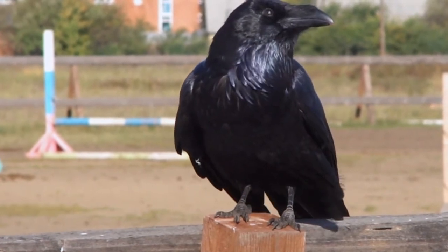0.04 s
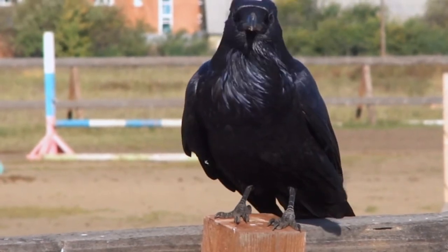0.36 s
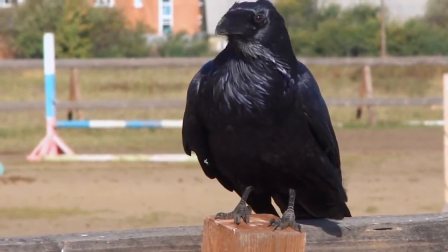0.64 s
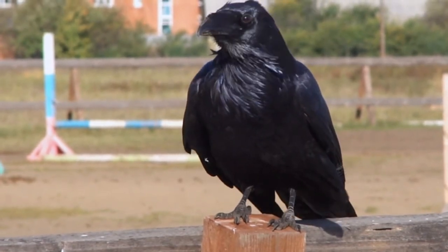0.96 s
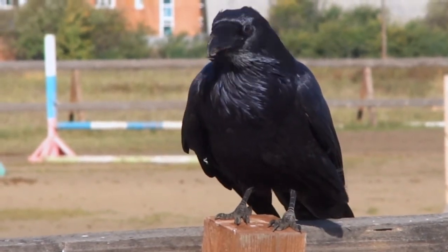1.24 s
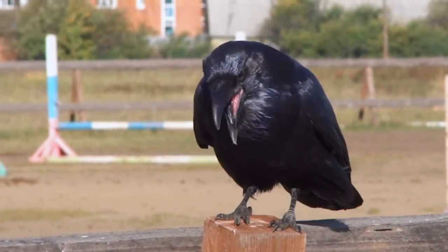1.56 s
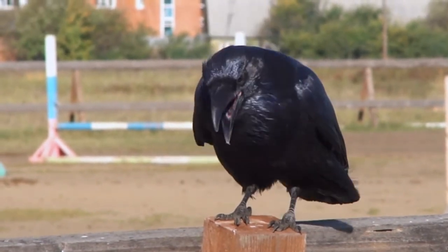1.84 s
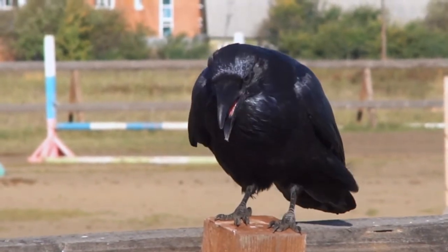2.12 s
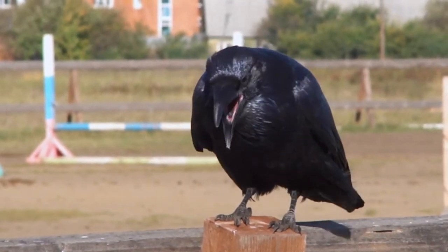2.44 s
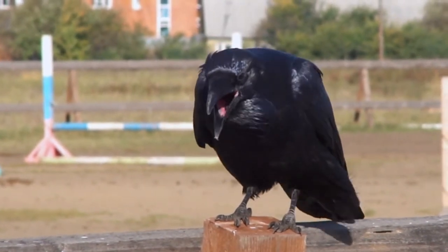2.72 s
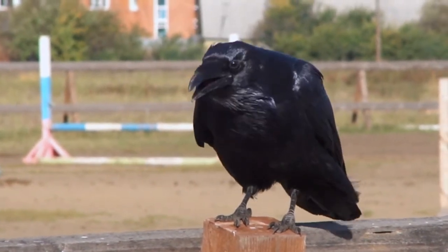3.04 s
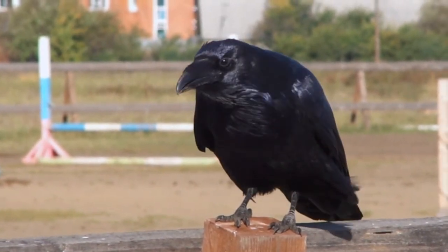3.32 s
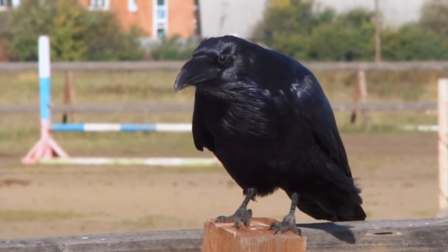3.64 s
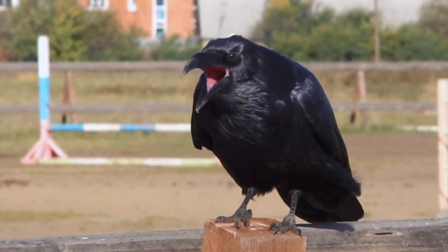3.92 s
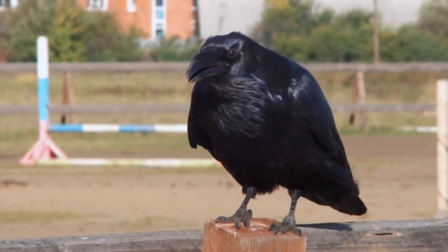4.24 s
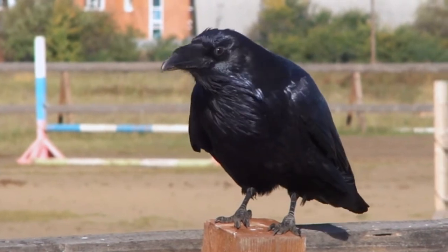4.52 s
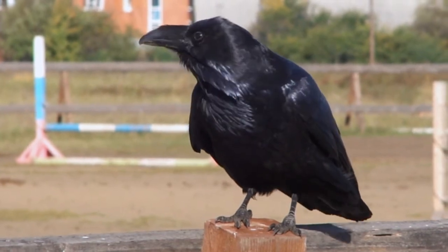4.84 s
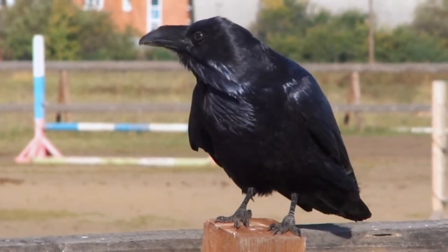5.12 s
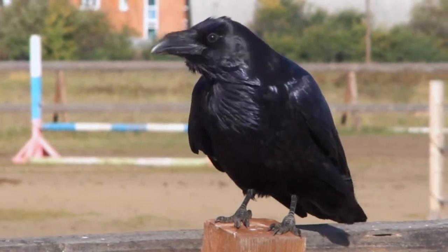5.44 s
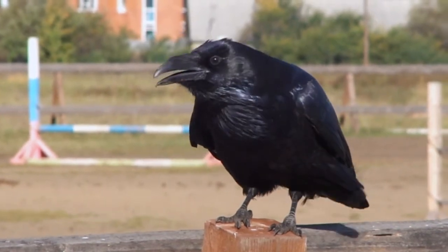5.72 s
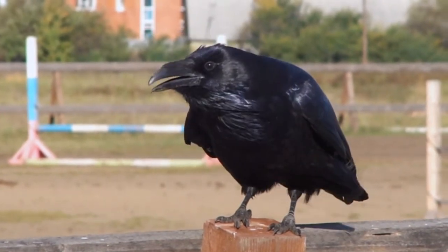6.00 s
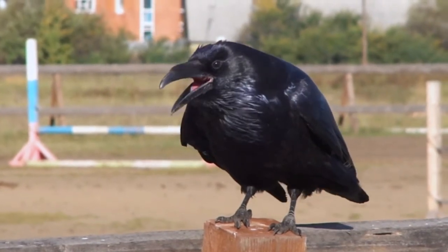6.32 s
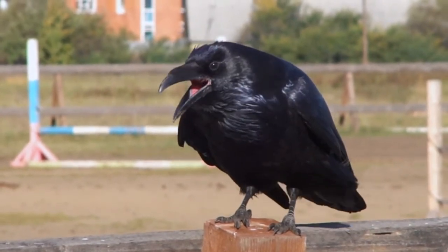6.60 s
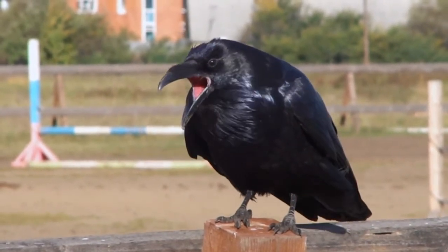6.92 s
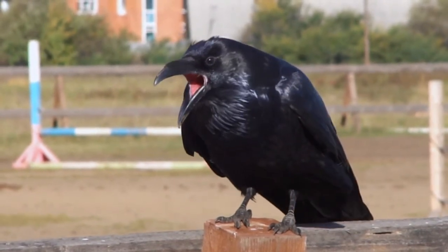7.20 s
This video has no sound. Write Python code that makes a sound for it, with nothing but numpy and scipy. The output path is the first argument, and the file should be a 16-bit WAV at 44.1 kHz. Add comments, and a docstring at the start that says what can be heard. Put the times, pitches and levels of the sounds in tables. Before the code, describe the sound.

A raven gives five hoarse, rattling croaks outdoors while gusts of wind rumble and bump on the microphone.

```python
"""An open paddock: a raven on a fence post gives five hoarse, rattling croaks, from an almost
shut beak to a wide-open rasp. Each croak is a train of air bursts that slap the syrinx membranes
and ring the throat and beak; ground and fences return a faint tail. Gusts buffet the two
microphone ports and now and then make them crackle. An outdoor hiss lies behind."""
import sys
import numpy as np
from scipy import signal
from scipy.fft import rfft, irfft, next_fast_len
from scipy.io import wavfile
from scipy.ndimage import uniform_filter1d

SR = 44100
rng = np.random.default_rng(int(sys.argv[2]) if len(sys.argv) > 2 else 0)


def waveform_to_disk(signal):
    """Save audio, clipped to [-1, 1], as 16-bit WAV at the path in sys.argv[1]."""
    frames = np.transpose(np.atleast_2d(signal))
    scaled = np.clip(frames, -1, 1) * 32767
    samples = np.round(scaled).astype(np.int16)
    wavfile.write(sys.argv[1], SR, samples)


N = 324576
TIME = np.arange(N) / SR

# Gape is the opening of the beak: 0 shut, 1 half open, 2 wide, 3 full stretch.
# one curve per croak: t/s, voice level/dB, burst rate/Hz, gape, formant f/Hz, rasp over voice/dB
MUFFLED_CROAK = [(1.51, -46, 88, 0.56, 1180, -25), (1.56, -42, 101, 1.1, 1170, -15.5),
                 (1.65, -35, 93, 1.8, 1140, -27.5), (1.75, -48, 75, .9, 1130, -20),
                 (1.85, -41, 68, 1.5, 1170, -17), (2.03, -39.5, 63.5, 1.3, 1170, -20.5),
                 (2.17, -43, 67, 1.3, 1170, -23)]
HARSH_CROAK = [(2.53, -47.5, 79.7, 1.4, 1150, -23), (2.579, -34, 82.55, 1.94, 1160, -20),
               (2.69, -28.5, 80.45, 1.9, 1185, -23.5), (2.809, -39, 80.55, 1.32, 1145, -21.5),
               (3.025, -40, 83.2, 1.23, 1160, -19.5)]
SHORT_RATTLE = [(3.926, -36.5, 76.3, 1.1, 1230, -27), (3.95, -37, 59.04, 1.1, 1200, -10),
                (4.0, -27, 58.9, 1.1, 1170, -24), (4.025, -23, 74.95, 1.4, 1170, -19),
                (4.045, -30.5, 54.95, 1.33, 1150, -15.5), (4.08, -23, 53.2, 1.65, 1270, -16.5),
                (4.108, -31, 46.94, 1.35, 1270, -20.5), (4.143, -29.5, 43.5, 2, 1190, -17.5),
                (4.157, -31, 100.5, 1.8, 1250, -20), (4.182, -33, 68, 1, 1200, -27)]
LONG_GROWL = [(5.632, -36, 54.53, .05, 1130, -26), (5.68, -40, 51.77, .05, 1170, -31),
              (5.79, -37, 39, 0.13, 1160, -25), (5.87, -37.5, 44.6, .2, 1160, -24.5),
              (6.14, -39, 35.15, 0.2, 1150, -28), (6.21, -38, 54.02, 0.66, 1130, -19),
              (6.265, -39.5, 73.4, 1.4, 1170, -24), (6.33, -32, 59.77, 1, 1190, -26),
              (6.43, -31.5, 50.64, 0.53, 1173, -26.5), (6.55, -30, 42.7, 0.96, 1160, -27.5),
              (6.67, -31.5, 51.8, .9, 1206, -30.5), (6.715, -36.5, 84.3, .56, 1180, -30)]
OPEN_CAW = [(6.988, -28, 85.34, 2.2, 1246, -21), (7.012, -28, 74.04, 2.65, 1250, -16),
            (7.025, -20.5, 67.73, 1.9, 1240, -17.5), (7.06, -23, 54.97, 2.67, 1320, -18),
            (7.1, -21.5, 70.06, 2.6, 1260, -17), (7.16, -22, 73, 2.85, 1130, -19.5),
            (7.36, -24.5, 66.1, 3.05, 1140, -22)]
# the croaks in order: curve, share of each cycle that air flows, membrane f/Hz, pitch jitter (0-1)
CROAKS = [(MUFFLED_CROAK, 0.8, 305, .077), (HARSH_CROAK, 0.78, 305, 0.04), (SHORT_RATTLE, 0.56, 370, 0.09),
          (LONG_GROWL, 0.54, 360, .18), (OPEN_CAW, 1, 275, 0.05)]
# throat and beak resonances: f/Hz, width/Hz, gain/dB at gape 0, 1, 2, 3
THROAT = [(400, 175, -6, -10.5, -16.5, -26), (728, 60, 10, 5, -13.5, -12), (813, 62, 6.5, 6.5, -11, -8),
          (1326, 25, -17, 7, -3.5, -3.5), (1564, 145, -3, 12.5, -4.5, -5), (1837, 94, -1.5, 2, 1.5, -5),
          (1996, 100, -3.5, -3.5, -3, 3), (2247, 180, -6, -41, -23.5, -4),
          (2590, 250, -38, -31, -36, -15.5)]
# the gliding main resonance: width/Hz, gain/dB at gape 0, 1, 2, 3
FORMANT = (207, 0.5, 17.5, -3.5, -1.5)
# high resonances of the beak: f/Hz, width/Hz, gain/dB at gape 0, 1, 2, 3
BEAK = [(5350, 240, -13, 0.5, 1, 0), (6840, 990, 3, -1.5, -1, 1), (7340, 380, -13, 1, -0.088, -1)]
# colour of air rasping through the beak: f/Hz, level/dB
RASP_SPECTRUM = [(2000, -16), (3400, -6.5), (4500, -7.5), (5150, -3), (5550, 0), (6300, -2.5), (7300, -10),
                 (7900, -0.5), (8600, -5.5), (9500, -5.5), (10400, -16), (11400, -43), (14000, -51)]
# the breeze at the ports: t/s, level/dB, eddy f/Hz at the reference level, left over right/dB
BREEZE = [(0, -24.5, 350, -2), (.24, -23, 433, -6.5), (.29, -43, 400, -5.5), (.44, -31, 270, 14),
          (.68, -34.5, 248, 6), (.88, -24.5, 303, 13), (1.22, -30, 301, 3), (1.6, -24, 440, -4),
          (2.5, -24.5, 360, -4.5), (3.12, -27, 471, -5.5), (3.35, -24, 530, -9), (3.68, -29, 420, -8),
          (3.87, -46, 326, 3), (4.22, -52.5, 294, 1), (4.35, -19.5, 320, -0.5), (4.8, -32, 339, 3),
          (5.5, -49.5, 277, -4), (6.88, -58.5, 249, -6), (7.1, -34, 286, -2)]
# gusts on top of the breeze: t/s, length/s, level/dB, left over right/dB
GUSTS = [(0.036, 0.055, -16.5, -7.5), (0.125, 0.025, -26, -14), (0.163, 0.049, -17.5, -13),
         (0.22, 0.04, -19.5, -11), (0.477, 0.053, -22, 4.5), (0.566, 0.045, -26.5, 2),
         (0.763, 0.043, -23, 8), (0.839, 0.015, -22, 6), (0.87, 0.067, -24.5, -4),
         (0.942, 0.096, -15, -8.5), (1.038, 0.024, -17.5, 0), (1.091, 0.034, -20, 8),
         (1.274, 0.08, -21.5, 11.5), (1.377, 0.021, -21.5, 25), (1.431, 0.029, -21.5, 14),
         (1.472, 0.035, -17, -7), (1.529, 0.095, -16.5, -8.5), (1.631, 0.023, -18.5, -10),
         (1.696, 0.2, -20.5, 1.5), (1.823, 0.012, -18.5, -17), (1.858, 0.028, -24, 1),
         (1.953, 0.013, -18.5, 7), (2.049, .073, -18, 1), (2.137, 0.018, -19.5, -1),
         (2.185, .085, -18.5, -3.5), (2.279, 0.045, -27.5, -13), (2.353, 0.037, -21, -11.5),
         (2.429, 0.11, -21, -3.5), (2.586, 0.016, -25, 1), (2.729, 0.071, -13.5, -4),
         (2.839, 0.033, -16.5, -7.5), (2.942, 0.045, -20.5, -9), (3.013, 0.02, -18.5, -4.5),
         (3.049, 0.042, -19, -1.5), (3.166, 0.044, -16, -5), (3.21, 0.048, -18, -10),
         (3.264, 0.029, -17.5, -3.5), (3.298, 0.068, -18, -8.5), (3.375, 0.13, -21.5, -12.5),
         (3.536, 0.1207, -21.5, 0.5), (3.688, 0.027, -18.5, -7), (3.759, 0.0097, -19, -1),
         (3.788, 0.016, -20.5, -4.5), (3.809, 0.02, -27.5, -3.5), (4.249, 0.027, -21.5, -7.5),
         (4.343, 0.015, -18, -4), (4.373, 0.23, -14, 0), (4.615, 0.042, -23.5, 6),
         (4.752, 0.038, -19.5, -5), (4.81, 0.075, -22.5, -0.5), (4.917, 0.049, -16.5, 1),
         (4.972, 0.07, -11.5, 1), (5.153, 0.024, -33.5, 9), (5.203, 0.071, -34, 10),
         (5.276, 0.07, -22, 4.5), (5.348, .025, -30, -1), (5.523, 0.023, -39, -6), (5.66, 0.02, -24, -2),
         (5.806, 0.038, -31.5, -7.5), (5.869, 0.03, -31.5, -14), (5.956, 0.049, -31, -9.5),
         (6.15, 0.041, -17, 3.5), (6.188, 0.056, -22.5, -5.5), (6.41, 0.048, -27.5, -6.5),
         (6.997, 0.01, -21, 8.5), (7.175, 0.0096, -20, -15), (7.29, 0.014, -16.5, -3.5),
         (7.351, 0.039, -33.5, -4)]
# moments when the flow stalls: t/s
LULLS = [0.094, .205, .87, 1.033, 1.378, 1.845, 1.88, 1.919, 1.952, 2.178, 2.202, 2.345, 2.418, 2.82, 3.136,
         3.295, 3.381, 4.396, 4.486]
# sudden hits on the windward port: t/s, relative crack level/dB, relative thump level/dB
BUFFETS = [(0.037, -29.5, -14.5), (0.0647, -38, -13.5), (0.1257, -39, -15.5), (0.184, -42.5, -16),
           (0.226, -64, -25), (0.8536, -38.5, -18.5), (0.9507, -30.5, -20), (1.05, -54, -19),
           (1.105, -36.5, -27), (1.116, -36.5, -16), (1.283, -57, -14), (1.326, -39, -26),
           (1.4397, -30, -18.5), (1.486, -40, -13), (1.7501, -40, -15.5), (1.892, -36, -12.5),
           (1.966, -62, -16), (2.0956, -35, -9.5), (2.166, -62, -14), (2.2125, -59, -14.5),
           (2.454, -38.5, -27), (2.7399, -47, -12.5), (2.761, -34, -13), (2.841, -57, -24),
           (3.077, -32.5, -16), (3.158, -28, -9.5), (3.17, -44, -31), (3.185, -31, -10.5),
           (3.322, -45, -16), (3.39, -39.5, -15), (3.4356, -42, -19), (4.256, -38, -28),
           (4.3436, -39, -17.5), (4.3791, -25.5, -9.5), (4.404, -32, -18), (4.4287, -28, -16),
           (4.467, -30, -13), (4.476, -25, -23), (4.5003, -31, -12.5), (4.544, -20.5, -8.5),
           (4.57, -31, -11), (4.771, -28, -14), (4.978, -36, -22), (4.992, -22, -17), (5.019, -22.5, -18),
           (5.323, -38.5, -38), (7.179, -40, -21), (7.2989, -32, -24)]
# colour of the sputter at the ports: f/Hz, level/dB
CRACKLE_SPECTRUM = [(700, -25), (2000, 3.5), (3100, 2.0), (5000, -2.5), (10000, -11),
                    (14000, -9.5), (15500, -23.5)]
# background hiss as the recorder's gain rises and falls: t/s, level/dB
HISS_LEVEL = [(0, -48), (.3, -54.5), (.75, -41.5), (1.3, -50), (2.3, -53.5), (3.3, -54.5), (3.85, -54.5),
              (4.25, -42), (4.7, -49), (5.1, -46), (5.45, -40.5), (6.2, -41.5), (6.9, -41.5), (7.36, -32)]
# colour of the outdoor hiss: f/Hz, level/dB
HISS_SPECTRUM = [(30, -28), (90, -2.5), (200, -1.5), (450, -2), (720, -0.5), (1000, -2.5), (1500, -6),
                 (2200, -15), (2900, -31.5), (4500, -38.5), (6000, -30.5), (9000, -34), (11000, -47.5),
                 (14000, -75.5)]
# narrow dips, the four lowest from ground reflection, the rest from the microphone:
# f/Hz, width/Hz, gain/dB
DIPS = [(874, 64, -5), (1448, 71, 0.5), (1725, 90, -5), (2104, 120, -5), (3006, 420, -11.5),
        (3986, 340, -16.5), (5070, 450, -14.5), (6060, 79, -17), (8040, 300, -15), (9020, 280, -8.5)]


def raven(breath=0.3, slap_share=0.51, buzz_gain=0.88):
    """Slaps and turbulent air ring the throat; the gape shifts weight to the upper resonances."""
    level_db, _, gape, formant_hz, rasp_db = in_time([row for curve, *_ in CROAKS for row in curve])
    level_db = level_db + croak_release()
    slaps, flow = np.sum([syrinx(*croak) for croak in CROAKS], axis=0)
    source = rms_one(slaps) + breath * rms_one(flow * rng.standard_normal(N))
    voice = resonate(source, THROAT, gape) + formant(source, formant_hz, gape)
    # each burst rings as loudly as its airflow is strong
    drive = evened(butter(flow, 210, "low"), seconds=0.11)
    voice = from_db(level_db) * evened(voice, seconds=.01) * np.sqrt(power(drive, seconds=.01))
    # every slap lets through a puff of hissing air
    puffs = butter(slaps, 330, "low") * drive
    jet = evened(slap_share * rms_one(puffs) + (1 - slap_share) * rms_one(drive ** 2), seconds=0.021)
    hiss = jet * coloured(stereo_noise(0.5), RASP_SPECTRUM)
    # the slaps also ring the beak's high resonances directly
    buzz = evened(resonate(slaps, BEAK, gape), seconds=0.28)
    rasp = from_db(level_db + rasp_db) * (hiss + buzz_gain * buzz) / np.hypot(1, buzz_gain)
    return voice * panned(-1) + rasp * panned(0)


def syrinx(curve, open_share, membrane_hz, jitter, leak=0.067, sag=0.31, open_s=.0006, close_s=.0017):
    """Air escapes in bursts, each slapping the membranes a few times. Returns (slaps, airflow)."""
    times, _, rates_hz, *_ = np.transpose(curve)
    sounding = (TIME >= times[0]) & (TIME < times[-1])
    rate_hz = np.interp(TIME, times, rates_hz)
    cycles = np.cumsum(rate_hz * sounding) / SR
    slaps, flow = np.zeros(N), leak * sounding
    age = np.arange(SR // 30) / SR
    for start in np.flatnonzero(np.diff(np.ceil(cycles), prepend=0) > 0):
        burst_s = open_share / rate_hz[start] * np.exp(0.12 * rng.normal())
        opening = 1 - np.exp(-age / open_s)
        pressure = 1 - sag * np.minimum(age / burst_s, 1)
        closing = 1 / (1 + np.exp((age - burst_s) / close_s))
        burst = opening * pressure * closing * from_db(rng.normal())
        flow[start:start + len(age)] += burst[:N - start]
        # uneven timing and force make the voice hoarse
        periods = np.exp(jitter * rng.standard_normal(8)) / membrane_hz
        slap_at = ((open_s + np.cumsum(periods) - periods[0]) * SR).astype(int)
        force = from_db(6 * rng.standard_normal(len(slap_at)))
        inside = slap_at < min(len(age), N - start)
        slaps[start + slap_at[inside]] += force[inside] * burst[slap_at[inside]]
    return slaps, flow


def resonate(source, resonances, gape):
    """Parallel resonances whose strengths follow the opening of the beak."""
    out = 0
    for hz, width, *gains_db in resonances:
        out = out + gape_gain(gape, gains_db) * butter(source, [hz - width / 2, hz + width / 2], "band")
    return out


def formant(source, centre_hz, gape, waver=0.025, waver_hz=30):
    """The main throat resonance glides as the neck stretches, and wavers a little."""
    width, *gains_db = FORMANT
    hz = centre_hz * (1 + waver * drift(waver_hz))
    carrier = np.exp(2j * np.pi * np.cumsum(hz) / SR)
    # a moving band-pass: shift down, low-pass, shift back
    ring = 2 * np.real(butter(source / carrier, width / 2, "low") * carrier)
    return gape_gain(gape, gains_db) * ring


def gape_gain(gape, gains_db):
    """A resonance's gain, blended between the four beak positions."""
    return from_db(np.interp(gape, np.arange(len(gains_db)), gains_db))


def croak_release(depth_db=-10, release_s=0.015):
    """Fade in dB as the air pressure dies away at the end of each croak but the last."""
    ends = [curve[-1][0] for curve, *_ in CROAKS[:-1]]
    remaining_s = np.min([np.where(TIME < end + .1, end - TIME, 1) for end in ends], axis=0)
    return depth_db * np.exp(-np.maximum(remaining_s, 0) / release_s)


def squeak(start_s=6.195, end_s=6.265, level_db=-56, first_hz=5750, last_hz=5400, flutter_hz=130):
    """A thin, sinking whistle as the beak opens in the middle of the growl."""
    along = np.clip((TIME - start_s) / (end_s - start_s), 0, 1)
    whistle = np.sin(2 * np.pi * np.cumsum(first_hz + (last_hz - first_hz) * along) / SR)
    return from_db(level_db) * np.sin(np.pi * along) * whistle * drift(flutter_hz)


def paddock_echo(sound, echo_db=-27, t60_s=0.13, dull_hz=4500):
    """Ground and fences scatter a faint, dull tail, different on each side."""
    age = np.arange(SR // 2) / SR
    scatter = rng.standard_normal((2, len(age))) * from_db(-60 * age / t60_s) * (age > .004)
    scatter = butter(scatter, dull_hz, "low")
    scatter = scatter / np.sqrt(np.sum(scatter ** 2, axis=1, keepdims=True))
    return from_db(echo_db) * signal.fftconvolve(sound, scatter, axes=1)[:, :N]


def airflow(attack_s=0.002, release_s=0.0069, sag_db=1, reference_db=-20, octaves_per_db=.025):
    """Breeze and gusts add up at the ports. Returns (level/dB, eddy f/Hz, left over right/dB)."""
    breeze_db, eddy_hz, breeze_pan_db = in_time(BREEZE)
    total_power = from_db(breeze_db) ** 2
    weighted_pan = total_power * breeze_pan_db
    for start, length, gust_db, pan_db in GUSTS:
        near = slice(max(int((start - .1) * SR), 0), int((start + length + .1) * SR))
        age = TIME[near] - start
        attack = (1 + np.tanh(age / attack_s)) / 2
        release = (1 + np.tanh((length - age) / release_s)) / 2
        hold = from_db(gust_db + sag_db * (.5 - np.clip(age / length, 0, 1)))
        gust_power = (attack * hold * release) ** 2
        total_power[near] += gust_power
        weighted_pan[near] += gust_power * pan_db
    level_db = 10 * np.log10(total_power) + lulls()
    # stronger wind makes smaller, higher eddies
    eddy_hz = eddy_hz * 2 ** (octaves_per_db * (level_db - reference_db))
    return level_db, eddy_hz, weighted_pan / total_power


def lulls(depth_db=-11, width_s=0.0054):
    """Brief dips in dB where the flow stalls between two eddies."""
    return depth_db * sum(np.exp(-np.minimum(((TIME - t) / width_s) ** 2, 20)) for t in LULLS)


def wind_rumble(level_db, eddy_hz, pan_db, trim_db=2, lump_db=2, lump_hz=42, ceiling=0.79):
    """Eddies beat on the ports in lumps, mostly in opposite phase; smaller eddies reach higher."""
    lumps = np.minimum(drift(lump_hz), 1.25)
    top_hz = 1.237 * eddy_hz * np.exp(0.16 * lumps)
    bottom_hz = 195 * (eddy_hz / eddy_hz.mean()) ** 0.65
    noises = [stereo_noise(correlation=-0.67) for _ in range(2)]
    edges_hz = 20 * 2 ** (np.arange(16) / 2)
    rumble = 0
    # half-octave bands fade in and out between the two moving corners
    for k, (low, high) in enumerate(zip(edges_hz, edges_hz[1:])):
        hz = np.sqrt(low * high)
        share = 1 / (1 + (hz / top_hz) ** 8.5) / (1 + (bottom_hz / hz) ** 5.3)
        rumble = rumble + np.sqrt(share) * butter(noises[k % 2], [low, high], "band", order=3)
    rumble = rumble * from_db(lump_db * lumps)
    rumble = rumble / np.sqrt(uniform_filter1d(np.mean(rumble ** 2, axis=0), int(0.038 * SR)))
    rumble = from_db(level_db + trim_db) * rumble * panned(pan_db)
    rounded = ceiling * np.tanh(rumble / ceiling)
    return butter(butter(rounded, 2750, "low", order=4), 75, "high")


def buffets(eddy_hz, pan_db, thump_trim_db=7.5, crack_trim_db=-9.5, crack_s=0.00073, crunch_s=0.017):
    """A sudden eddy hits the windward port: a thump at the eddy pitch, a crack and a ragged crunch."""
    out, age = np.zeros((2, N)), np.arange(SR // 20) / SR
    impulse = 1.0 * (age == 0)
    swell = age / crack_s * np.exp(1 - age / crack_s)
    ragged = np.abs(drift(250))
    ports = np.array([[1.4], [-.4]])  # the sheltered port gets a weak, inverted copy
    for t, crack_db, thump_db in BUFFETS:
        start = int(t * SR)
        span = slice(start, start + len(age))
        thump = butter(impulse, eddy_hz[start] * np.array([0.59, 1.88]), "band", order=3)
        thump = butter(butter(thump, 140, "high"), 1700, "low", order=3)
        crunch = from_db(-12) * np.exp(-age / crunch_s) * ragged[span]
        crack = rng.standard_normal(len(age)) * (swell + crunch) + 10 * impulse
        crack = butter(crack, [1000, 4000], "band", order=1)
        hit = from_db(thump_db + thump_trim_db) * thump / np.abs(thump).max()
        hit += from_db(crack_db + crack_trim_db) * crack / np.std(crack[age < 4 * crack_s])
        out[:, span] += hit * (ports if pan_db[start] > 0 else ports[::-1])
    return out


def crackle(wind_db, level_db=-52.5, threshold_db=-16, knee_db=0.45, grit_db=5, grit_hz=160):
    """Gusts that pass a threshold add a bright, uneven sputter."""
    gate = (1 + np.tanh((wind_db - threshold_db) / knee_db)) / 2
    sputter = coloured(stereo_noise(0.081), CRACKLE_SPECTRUM)
    grit = rms_one(from_db(grit_db * np.minimum(drift(grit_hz), 2)))
    return from_db(level_db) * gate * grit * sputter


def outdoor_hiss():
    """Background hiss on a drawn level curve, rising and falling with the recorder's gain."""
    level_db, = in_time(HISS_LEVEL)
    return from_db(level_db) * coloured(stereo_noise(0.6), HISS_SPECTRUM)


def hollowed(sound):
    """Narrow dips hollow the sound: low ones from ground reflection, high ones from the microphone."""
    size = next_fast_len(N)
    hz = np.fft.rfftfreq(size, 1 / SR)
    gain_db = sum(db * np.exp(-(2 * (hz - centre) / width) ** 2) for centre, width, db in DIPS)
    return irfft(rfft(sound, size) * from_db(gain_db), size)[..., :N]


def from_db(db):
    """Decibels to gain."""
    return 10 ** (np.asarray(db) / 20)


def rms_one(x):
    """Scale to unit power."""
    return x / np.sqrt(np.mean(x ** 2) + 1e-20)


def power(x, seconds):
    """Running mean square, kept just above zero."""
    return np.maximum(uniform_filter1d(x ** 2, int(seconds * SR)), 0) + 1e-3 * np.mean(x ** 2)


def evened(x, seconds):
    """Ride the gain to hold the running power near 1."""
    return x / np.sqrt(power(x, seconds))


def in_time(rows):
    """Breakpoints to automation curves, one per column after the time."""
    times, *columns = np.transpose(rows)
    return [np.interp(TIME, times, column) for column in columns]


def butter(x, hz, kind, order=2):
    """Causal Butterworth filter."""
    sections = signal.butter(order, np.clip(hz, 10, .45 * SR), kind, fs=SR, output="sos")
    return signal.sosfilt(sections, x + 1e-18)


def drift(rate_hz):
    """Smooth random modulation, rms 1, made at a twentieth of the sample rate."""
    coarse = butter(rng.standard_normal(N // 20 + 2000), rate_hz * 20, "low")[1990:]
    return np.interp(np.arange(N) / 20, np.arange(len(coarse)), rms_one(coarse))


def panned(pan_db):
    """Constant-power left and right gains; positive leans left."""
    gains = from_db(np.array([pan_db, -pan_db]).reshape(2, -1) / 2)
    return gains / np.sqrt(np.mean(gains ** 2, axis=0))


def stereo_noise(correlation):
    """White noise whose two sides have the given correlation."""
    mid, side = rng.standard_normal((2, N))
    return rms_one(np.sqrt(1 + correlation) * mid + np.sqrt(1 - correlation) * side * [[1], [-1]])


def coloured(noise, spectrum):
    """Noise equalised to the given spectrum, rms 1."""
    points_hz, points_db = np.transpose(spectrum)
    size = next_fast_len(N)
    hz = np.maximum(np.fft.rfftfreq(size, 1 / SR), 1)
    gain = from_db(np.interp(np.log(hz), np.log(points_hz), points_db))
    return rms_one(irfft(rfft(noise, size) * gain, size)[..., :N])


def scene():
    """The bird in the open, with wind beating directly on the microphone."""
    bird = raven() + squeak()
    wind_db, eddy_hz, pan_db = airflow()
    airborne = hollowed(bird + paddock_echo(bird) + outdoor_hiss())
    return airborne + wind_rumble(wind_db, eddy_hz, pan_db) + buffets(eddy_hz, pan_db) + crackle(wind_db)


def record(dry, ceiling=.92, low_cut_hz=39, top_cut_hz=15800):
    """Rounded peaks, a bass roll-off and a steep top cut."""
    rounded = dry / (1 + (dry / ceiling) ** 6) ** (1 / 6)
    top_cut = signal.cheby2(12, 70, top_cut_hz, fs=SR, output="sos")
    return signal.sosfilt(top_cut, butter(rounded, low_cut_hz, "high"))


dry = scene()
out = record(dry)
waveform_to_disk(out)
```